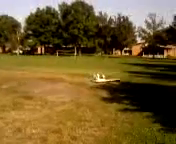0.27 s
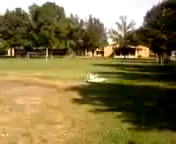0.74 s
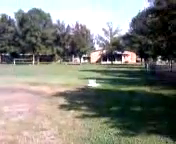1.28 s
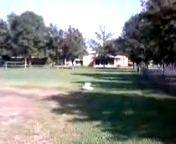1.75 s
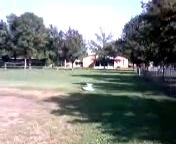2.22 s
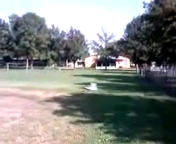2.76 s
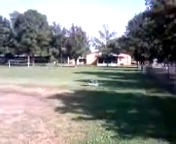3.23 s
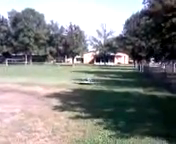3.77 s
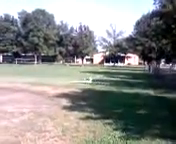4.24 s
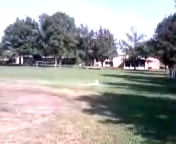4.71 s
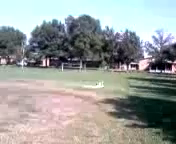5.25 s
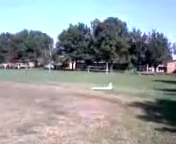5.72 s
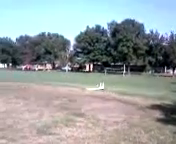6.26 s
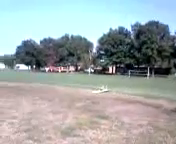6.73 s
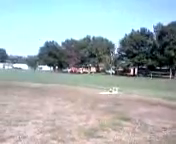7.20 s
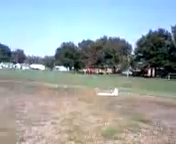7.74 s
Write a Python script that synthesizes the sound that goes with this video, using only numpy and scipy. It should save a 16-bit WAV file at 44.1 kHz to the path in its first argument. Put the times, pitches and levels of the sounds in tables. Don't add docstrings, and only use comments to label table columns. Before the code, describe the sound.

A sharp metallic buzz from a tiny two-stroke motor sputters, sags and recovers, then drones on at nearly constant pitch. Fan hum and a low wash of air under the skirt sit beneath it. Faint reflections from ground, trees and houses make the tone flutter as the craft slides away. Soft wind gusts bump a dull, band-limited camera microphone with little high treble.

```python
import sys
import numpy as np
from scipy import signal
from scipy.fft import rfft, irfft, next_fast_len
from scipy.io import wavfile
from scipy.ndimage import uniform_filter1d, map_coordinates

SR = 44100
rng = np.random.default_rng(int(sys.argv[2]) if len(sys.argv) > 2 else 0)


def amplitude_ratio(level_db):
    exponent = np.asarray(level_db, float) / 20
    return 10 ** exponent


def dump(signal):
    limited = np.clip(np.atleast_2d(signal).T, -1, 1)
    pcm = np.round(limited * 32767).astype(np.int16)
    wavfile.write(sys.argv[1], SR, pcm)


N = 351918
STUMBLE_START_S, STUMBLE_END_S = .22, .6


def evened(x, size=None):
    if size is None:
        power = np.mean(x ** 2)
    else:
        power = uniform_filter1d(uniform_filter1d(x ** 2, size), size)
    return x / np.sqrt(abs(power) + 1e-20)


def curves(rows):
    s, *columns = np.transpose(rows)
    return [np.interp(np.arange(N) / SR, s, c) for c in columns]


def bumps(rows, axis=2):
    t = np.arange(0, N + 64, 64) / SR
    rises = sum(row[axis] * np.exp(-((t - row[0]) / row[1]) ** 2) for row in rows)
    return np.interp(np.arange(N) / SR, t, rises)


def openings(rows):
    return 20 * np.log10(bumps([(s, length, amplitude_ratio(db)) for s, length, db, _ in rows]) + 1e-4)


def drift(per_s):
    t = np.arange(0, N, 256) / SR
    rates = np.geomspace(per_s / 8, per_s, num=12)
    slow = sum(np.sin(2 * np.pi * (f * t + rng.random())) / np.sqrt(f) for f in rates)
    return np.interp(np.arange(N) / SR, t, evened(slow))


def colour(x, points, size=4096):
    f, db = np.transpose(points)
    hz = abs(np.fft.fftfreq(size, 1 / SR))
    log_gain = np.log(amplitude_ratio(np.clip(np.interp(np.log(hz + 1), np.log(f), db), -100, 0)))
    taps = np.fft.ifft(np.exp(np.conj(signal.hilbert(log_gain)))).real
    return signal.oaconvolve(x, taps[:size // 2])[:N]


def resonate(x, hz, width_hz):
    turn = np.exp(2j * np.pi * np.cumsum(hz) / SR)
    r = np.exp(-np.pi * width_hz / SR)
    return (turn * signal.lfilter([1], np.poly([r, r]), x / turn)).real


# f [Hz], level [dB]
WIND_COLOUR = [(12, -32.5), (20, -13), (119, -1), (171, -6.5), (200, -4.5), (260, -38), (440, -120)]
# t [s], length [s], level over the calm [dB]
GUSTS = [
    (.36, 0.19, 11),
    (1.85, 0.58, 11.5),
    (2.5, 0.41, 9),
    (3.1, 0.34, 11),
    (3.6, 0.22, 4.5),
    (4.16, 0.3, 9),
    (5.4, 0.069, 9),
    (6.4, 0.54, 5.5),
    (6.88, 0.023, 10),
    (7.72, 0.16, 8.5),
]


def wind():
    rumble = evened(colour(rng.standard_normal(N), WIND_COLOUR))
    return amplitude_ratio(-64.5 + bumps(GUSTS) + 3 * drift(12)) * rumble


def cushion():
    return -50 + .59 * (curves(FAN)[0] + 45)


# f [Hz], level [dB]
WASH = [(76, -55.5), (130, -28.5), (231, -5), (286, -8), (467, -5.5), (642, -24), (1500, -5.5),
        (1950, -25.5), (3300, -120)]


def skirt_wash():
    wash = evened(colour(rng.standard_normal(N), WASH))
    return amplitude_ratio(cushion() + 1.8 * drift(6)) * wash


# t [s], f [turns/s]
SPEED = [(0, 116.7), (.2, 118.15), (.4, 101.2), (.6, 90.8), (.7, 92.3), (.83, 89.9), (1.04, 90.5),
         (1.3, 105.2), (1.5, 113.5), (1.7, 117.6), (2.03, 119.8), (2.42, 117.35), (4.1, 116.55),
         (5.15, 118.1), (5.6, 117.3), (6.7, 116.95), (7.5, 118.7), (7.98, 118.6)]


def crank():
    return np.cumsum(curves(SPEED)[0]) / SR - .21


# t [s], level [dB]
FAN = [(0, -57), (.2, -42), (.45, -72), (.62, -67.5), (1.4, -55), (1.7, -39.5), (2.1, -38.5), (2.65, -38.5),
       (3.5, -44.5), (4.5, -51.5), (5.36, -44.5), (6.1, -53), (7.1, -49), (7.45, -55), (7.98, -47)]
# shaft order [1], level [dB]
BLADE_ORDERS = [
    (4, -56),
    (6, -54),
    (8, -53),
    (10, -55),
]


def fan():
    angle = 2 * np.pi * crank()
    fan_db = curves(FAN)[0]
    flutter_db = 1.4 * drift(30) + 1.6 * drift(5.6)
    blades = np.sqrt(2) * amplitude_ratio(fan_db + flutter_db) * np.sin(2 * angle)
    blades += amplitude_ratio(cushion() + np.minimum(fan_db + 56, 0) - 3.5 + 4.1 * drift(4.8)) * np.sin(3 * angle)
    running_db = np.minimum(curves(SPEED)[0] - 116, 0)
    overtones = sum(amplitude_ratio(db + running_db + 5.75 * drift(3.3)) * np.sin(order * angle)
                    for order, db in BLADE_ORDERS)
    shaft = amplitude_ratio(cushion() - 12 + 3 * drift(12)) * np.sin(angle)
    return overtones + amplitude_ratio(-1) * blades + shaft


# t [s], crack level [dB], low pop level [dB]
CATCH = [
    (.23, -4, -41),
    (.26, -1.5, -41),
    (.33, -9, -39),
    (.39, -5, -35),
    (.42, -7, -42),
    (.465, -15, -44),
    (.5, -7, -45),
    (.52, -4, -45),
    (.563, -2, -54),
    (.585, -3.5, -56),
]


def pops(hz=270, t60=0.03):
    out, t = np.zeros(N), np.arange(2000) / SR
    at = np.interp(np.arange(1, 100, 2), crank(), np.arange(N) / SR)
    at = at[(at > STUMBLE_START_S) & (at < STUMBLE_END_S)]
    levels = np.interp(at, *np.transpose(CATCH)[::2])
    for s, db, bend in zip(at, levels, rng.uniform(0.51, 1.65, len(at))):
        thud = amplitude_ratio(db + 8 - 60 * t / t60) * np.sin(2 * np.pi * hz * bend * t)
        out[round(s * SR):][:len(t)] += thud
    return out


# t [s], share [0-1]
ROUGH = [(0, .05), (.2, .05), (.4, .2), (.6, .07), (1.1, .04), (1.7, .08), (2, .06), (2.3, .15), (3.7, .14),
         (3.9, .08), (4.3, .17), (4.6, .04), (5.7, .06), (6.5, .3), (6.9, .28), (7.05, .06), (7.3, .22),
         (7.98, .08)]
# t [s], share [0-1]
SMEAR = [(0, 0), (.28, 0), (.31, .35), (.37, .55), (.4, .15), (.43, .4), (.485, .6), (.5, .3), (.6, 0),
         (7.98, 0)]
# t [s], level [dB]
ODD_FIRINGS = [(.341, -9), (.399, .5), (.5, -7), (.564, 2.7), (.718, -.5), (.76, -1), (.608, 1), (.619, 1),
               (.63, 1.8), (.641, 2), (.652, 2), (.663, 3), (.673, 1), (.695, 0), (.739, 1), (.75, .5),
               (.728, -2), (.893, 1), (.993, -1.5), (1.015, .8), (1.059, 1.5), (.838, -4), (.904, -3),
               (1.004, -5), (1.08, 3.5), (1.102, 2.5), (1.143, -1), (1.164, 1), (1.215, 2.5), (1.245, -3),
               (1.264, 2.5), (1.274, 2.5), (1.283, 2.5), (1.331, 1), (1.34, 2), (1.359, 2.2), (1.405, -1),
               (1.432, -1.5), (1.441, 3.5), (1.459, -3), (1.494, 5), (1.503, 5), (1.565, 3.3),
               (1.574, -1.5), (1.369, -.5), (1.303, -.5), (1.322, -.5), (1.582, 1), (1.642, 1),
               (1.694, 1.5), (1.787, -3), (1.599, -4), (1.608, -1.5), (1.651, -3), (1.668, -2)]


def firings(uneven_db=0.7, jitter_ms=0.0021, misfire_db=-17, full_db=-3, puff_turns=0.15):
    angle = crank()
    turn = np.arange(0, int(angle[-1]) + 1)
    chance = rng.standard_normal((len(turn), 2))
    at = np.interp(turn, angle, np.arange(N)) + chance[:, 0] * jitter_ms * SR / 1000
    stumbling = (at > STUMBLE_START_S * SR) & (at < STUMBLE_END_S * SR)
    caught_db = np.interp(at / SR, *np.transpose(CATCH)[:2]) - full_db
    stumble_db = np.where(turn % 2, caught_db, misfire_db)
    steady_db = chance[:, 1] * uneven_db * amplitude_ratio(np.interp(at / SR, *np.transpose(DISTANCE)))
    size = amplitude_ratio(np.where(stumbling, stumble_db, steady_db))
    for s, db in ODD_FIRINGS:
        size[np.argmin(abs(at - s * SR))] = amplitude_ratio(db)

    whole = np.clip(at.astype(int), 0, N - 2)
    cracks = np.zeros(N)
    cracks[whole], cracks[whole + 1] = size * (1 - at % 1), size * (at % 1)

    gas, smear = rng.standard_normal(N), curves(SMEAR)[0]
    burn = signal.oaconvolve(cracks, np.exp(-np.arange(600) / SR / .0022))[:N] * gas / 6
    cracks = np.sqrt(1 - smear) * cracks + np.sqrt(smear) * burn
    this_turn = np.clip(angle.astype(int), 0, len(turn) - 1)
    puffs = (1 + size[this_turn] * np.exp(-(angle % 1) / puff_turns)) * gas
    smooth = signal.butter(4, 5000, fs=SR, output="sos")
    cracks, puffs = (evened(signal.sosfilt(smooth, x), size=4000) for x in (cracks, puffs))
    rough = np.clip(curves(ROUGH)[0], 0, 1)
    return np.sqrt(1 - rough) * cracks + np.sqrt(rough) * puffs


# delay [ms], level [dB]
ECHOES = [(1.5, -11), (2.9, -10), (4.7, -15), (6.1, -18), (7.3, -16), (12.2, -16), (19.7, -17), (31.1, -17)]
# t [s], level [dB]
DISTANCE = [(0, -7), (.25, -7), (.42, -3), (.6, -9), (1.6, -8), (2.1, 0), (7.98, 0)]


def echoes(x, wander_ms=.05, fading_db=4):
    out, now, far_db = x.copy(), np.arange(N), curves(DISTANCE)[0]
    for ms, db in ECHOES:
        delay = (ms + wander_ms * drift(5)) * SR / 1000
        level = amplitude_ratio(db + far_db + fading_db * amplitude_ratio(far_db) * drift(5.5))
        out += level * np.interp(now - delay, now, x)
    return out


# t [s], level [dB], nozzle towards the microphone [dB], muffler side shown [dB]
HEADING = [(0, -13, -2, 2.5), (.17, -12.5, 6.5, 5.5), (.46, -25.5, 0.5, -3.5), (.65, -14.5, 0, -7.5),
           (.87, -22.5, 1, -0.5), (1, -21.5, -20.5, -3.5), (1.35, -16, -17, -1.5), (1.7, -19, -6.5, -3),
           (1.95, -23.5, -11, -3), (2.35, -23.5, 6, -5.5), (3.1, -24, 2.5, -3), (4.1, -24, -4, -4.5),
           (4.7, -23.5, -0.5, -0.5), (5.35, -22.5, -3, 8), (6.05, -23, -7.5, 5.5), (6.8, -28, -1, 2.5),
           (7.25, -26.5, -6, 1.5), (7.98, -20.5, -8.5, 8)]
# t [s], length [s], level [dB], nozzle swing [dB]
SWELLS = [(.64, 0.04, -0.5, -2.5), (.76, 0.16, -1, -4), (1.09, 0.17, 0.5, 4.5), (1.41, 0.23, -2, -0.5),
          (3.1, 0.1, 1.5, 5), (3.37, 0.042, -1.5, -2.5), (3.56, 0.11, 3.5, 1.5), (3.75, 0.057, -2, 4),
          (3.89, 0.046, 2, -1.5), (4.25, 0.25, 0, 2), (5.13, 0.16, -4.5, -4), (5.28, 0.33, 1, 4.5),
          (5.65, 0.06, 0.5, 5), (5.95, 0.059, -4, 7.5), (6.3, 0.2, 0.5, 2), (7.33, 0.09, 2, -8.5),
          (7.77, 0.09, -2, 1)]
# t [s], length [s], rasp level [dB], growl level [dB]
BROADSIDE = [(.6, 0.15, -5, -3.5), (1, 0.36, 6.5, -9), (1.4, 0.26, 9, 11), (2, 0.44, 6, 8.5),
             (2.4, 0.27, -7, -1.5), (2.8, 0.05, 0, -12.5), (3.2, 0.26, -2.5, 5), (3.65, 0.079, 1, 4.5),
             (4.3, 0.098, -0.5, 2), (4.75, 0.21, -2, -12), (5.95, 0.12, 1, 9), (6.25, 0.19, -7, -4),
             (7.1, 0.41, -1, 3), (7.4, 0.18, 1, 3.5), (7.7, 0.088, 4, 0)]
# t [s], upper f [Hz], lower f [Hz], header f [Hz], header level [dB]
RINGS = [(0, 3348, 2827, 2095, 3.5), (.58, 3330, 2706, 2103, 2), (.78, 3260, 2820, 2070, 2.5),
         (.95, 3380, 2570, 2160, 2.5), (1.3, 3324, 2693, 2080, 1.5), (1.76, 3145, 2800, 2004, 2),
         (1.95, 3460, 2660, 2052, 3.5), (2.4, 3350, 2695, 1900, 5.5), (2.85, 3320, 2830, 2110, 0.5),
         (3.2, 3216, 2900, 1900, 4.5), (3.45, 3430, 2570, 2020, -3.5), (3.9, 3370, 2740, 2194, 3),
         (4.5, 3360, 2690, 2133, 2), (5.2, 3376, 2840, 2200, 6.5), (5.5, 3323, 2613, 2050, 1.5),
         (6, 3310, 2746, 2090, 8), (6.45, 3480, 2720, 2063, 2.5), (7.98, 3440, 2807, 2045, 2)]
PATCHY_DB = 1.4


def heading():
    loud_db, aim_db, side_db = curves(HEADING)
    far = amplitude_ratio(2 * curves(DISTANCE)[0])
    aim_db = aim_db + bumps(SWELLS, axis=3)
    loud_db = loud_db + bumps(SWELLS) + 0.98 * far * drift(12)
    upper_db, lower_db = (loud_db - 10 * np.log10(1 + amplitude_ratio(x) ** 2) for x in (-aim_db, aim_db))
    away = np.tanh(-aim_db / 8)
    rasp_db = -35.5 - 1.5 * away - 0.11 * side_db
    rasp_db = rasp_db + bumps(BROADSIDE) + 0.64 * bumps(SWELLS) + 1.2 * drift(8.1)
    body_db = -42 + side_db + PATCHY_DB / np.sqrt(far + 0.13) * drift(14)
    upper_hz, lower_hz = (hz + 20 * drift(7.5) for hz in curves(RINGS)[:2])
    return upper_db, lower_db, rasp_db, body_db, upper_hz, lower_hz


def scattered(x, patchy_db=2.8):
    z = signal.stft(x, nperseg=2048, noverlap=1536)[2]
    patches = uniform_filter1d(rng.standard_normal(z.T.shape), size=14, axis=0)
    patches = evened(uniform_filter1d(patches, size=5, axis=1))
    return signal.istft(z * amplitude_ratio(patchy_db * patches.T), nperseg=2048, noverlap=1536)[1][:N]


SPLIT_HZ = (3850, 2330, 1100, 290)
# f [Hz], level [dB]
PIPE = [(180, -29.5), (300, -13), (408, -17.5), (461, -9.5), (695, -8), (1300, -7), (1690, -21.5),
        (2860, -120)]
# f [Hz], level [dB]
MICROPHONE = [(20, 4.5), (3500, 2), (3700, -3), (3900, -14), (4200, -22), (4700, -33), (9000, -51)]
# f [Hz], level [dB]
RASP = [(1000, 1.5), (1300, 5), (1550, 9.5), (1850, 13), (2100, 6.5), (2350, -3.5)]
# f [Hz], level [dB]
GURGLE_COLOUR = [(20, 0), (800, 0), (1200, -5), (2200, -10), (2600, -30), (4000, -60)]
# t [s], length [s], share of the wide ring [1]
OPEN_THROTTLE = [
    (1.35, .45, 3),
]
# t [s], length [s], level [dB]
FIZZ_SWELLS = [
    (.1, .15, -5),
    (1.45, 0.26, 2.5),
    (2.2, 0.18, 4.5),
    (3.5, 0.19, 4),
    (6.7, 0.29, 2.5),
    (7.3, .25, 2.5),
]
# t [s], length [s], level [dB], offset from 2927 Hz [Hz]
MIDDLE = [(1.12, 0.067, -38.5, 10), (1.33, 0.043, -38, -14), (1.58, 0.14, -29, -24),
          (2.2, 0.082, -43, -55.5), (3.1, 0.2, -31, 51), (4.05, 0.11, -41, 32.5), (4.7, 0.16, -30.5, 55.5),
          (5.25, 0.063, -25.5, 39), (5.7, 0.06, -31, -41), (6.03, 0.068, -36, -45),
          (7.05, .12, -35.5, 26.5), (7.8, 0.084, -29.5, 56)]
# t [s], length [s], level [dB], offset from 1000 Hz [Hz]
SHELL = [
    (2.6, .25, -50, -60),
    (3.6, .3, -49, -60),
    (4.7, .2, -53, -60),
    (5.45, .2, -48, -60),
    (6.9, .25, -46, 170),
    (7.25, .15, -49, -60),
    (7.75, .25, -45, -60),
]


def exhaust(blend_hz=200, fizz_db=-56):
    upper_db, lower_db, rasp_db, body_db, upper_hz, lower_hz = heading()
    direct, size = colour(firings(), MICROPHONE), next_fast_len(N)
    gas = echoes(direct)
    gurgle = colour(rng.standard_normal(N), GURGLE_COLOUR)
    gas = gas + 3 * curves(ROUGH)[0] / amplitude_ratio(3.03 * curves(DISTANCE)[0]) * gurgle

    upper, lower = -resonate(gas, upper_hz, 450), resonate(gas, lower_hz, 500)
    lower = lower + bumps(OPEN_THROTTLE) * resonate(gas, lower_hz + 80, 2000)
    header_hz, header_db = curves(RINGS)[2:]
    header = -resonate(gas, header_hz, 650)
    middle_ring = resonate(gas, 2927 + bumps(MIDDLE, axis=3), 220)
    shell_ring = resonate(direct, 1000 + bumps(SHELL, axis=3), 200)
    hiss = gas + 1.4 * colour(rng.standard_normal(N), MICROPHONE)
    body = scattered(colour(gas + amplitude_ratio(3) * direct, PIPE))

    hz = np.fft.rfftfreq(size, 1 / SR)
    fizz, top, middle, bottom = (np.clip(.5 + (hz - edge) / blend_hz / 2, 0, 1) for edge in SPLIT_HZ)
    high = np.clip((hz - 2600) / 500, 0, 1)
    low = np.clip((3750 - hz) / 500, 0, 1)
    bright = np.clip(.5 + (hz - 1538) / 600, 0, 1)
    deep = np.clip(.5 + (405 - hz) / 100, 0, 1)
    growl_band = (middle - top) * amplitude_ratio(np.interp(hz, *np.transpose(RASP))) * (1 - bright)
    header_tilt = amplitude_ratio(np.interp(hz, [1200, 1700, 1900, 2390], [16.0, 3.5, -3.5, 5]))

    deep_db = body_db - 13.5 - (1 - 0.099) * curves(HEADING)[2]
    growl_db = rasp_db - 6 + bumps(BROADSIDE, axis=3) - bumps(BROADSIDE) + PATCHY_DB * drift(11)
    hiss_db = fizz_db + bumps(FIZZ_SWELLS) + 2 * drift(28)
    parts = [(openings(MIDDLE), middle_ring, top * low),
             (openings(SHELL), shell_ring, bottom - top),
             (deep_db, body, (bottom - middle) * deep),
             (body_db, body, (bottom - middle) * (1 - deep)),
             (upper_db, upper, high * (1 - fizz)),
             (lower_db, lower, top * low),
             (rasp_db + header_db, header, (middle - top) * bright * header_tilt),
             (growl_db, lower, growl_band),
             (hiss_db, hiss, fizz)]
    return sum(amplitude_ratio(db) * evened(irfft(rfft(x, size) * band, size)[:N], size=3000)
               for db, x, band in parts)


def shimmer(x, patchy_db=2, waver_ms=.022):
    _, t, z = signal.stft(x, nperseg=1024, noverlap=768)
    patches = rng.standard_normal(z.T.shape)
    for size, axis in ((16, 0), (16, 0), (3, 1)):
        patches = uniform_filter1d(patches, size=size, axis=axis)
    far = amplitude_ratio(np.interp(t / SR, *np.transpose(DISTANCE)))
    gain = amplitude_ratio(patchy_db * far * evened(patches).T)
    mottled = signal.istft(z * gain, nperseg=1024, noverlap=768)[1][:N]
    path = np.arange(N) + waver_ms * SR / 1000 * drift(24)
    return map_coordinates(mottled, [path], order=3, mode="nearest")


def scene():
    background = wind() + skirt_wash() + fan() + pops()
    return (background + shimmer(exhaust()))[None]


def top_cut(x):
    return signal.sosfilt(signal.butter(12, 17100, fs=SR, output="sos"), x)


def record(dry):
    narrow_taps = signal.firwin(801, 4620, window=("kaiser", 10), fs=SR)
    narrow = signal.oaconvolve(dry, narrow_taps[None], "same")
    clipped = np.clip(narrow, -.73, .73)
    limit_taps = signal.firwin(401, 15850, window=("kaiser", 9), fs=SR)
    limited = signal.oaconvolve(clipped, limit_taps[None], "same")
    return top_cut(limited)


dry = scene()
out = record(dry)
dump(out)
```